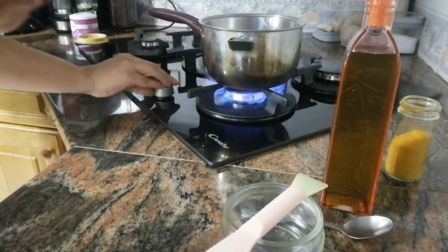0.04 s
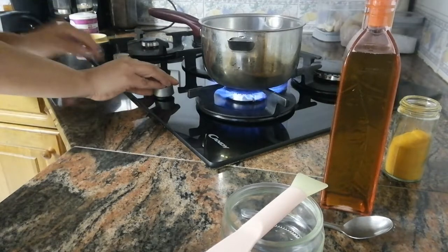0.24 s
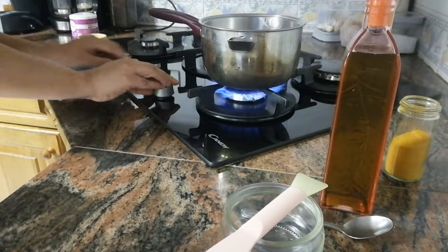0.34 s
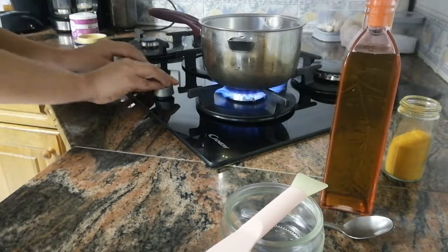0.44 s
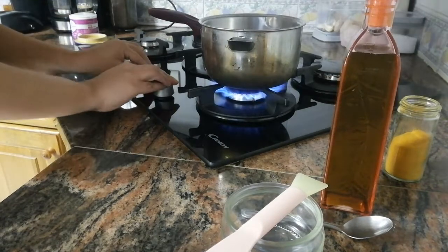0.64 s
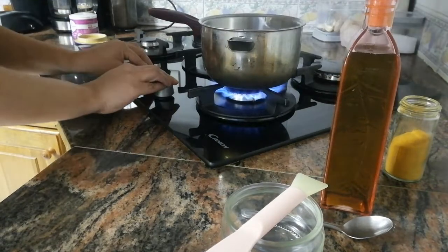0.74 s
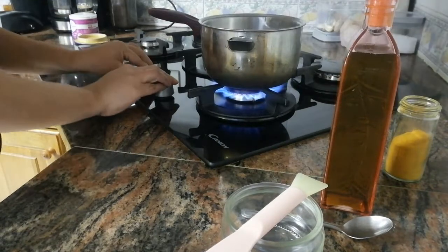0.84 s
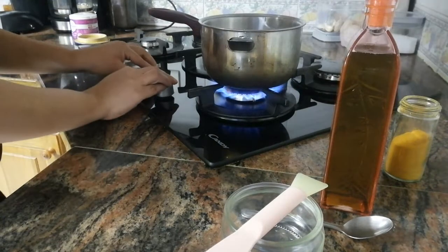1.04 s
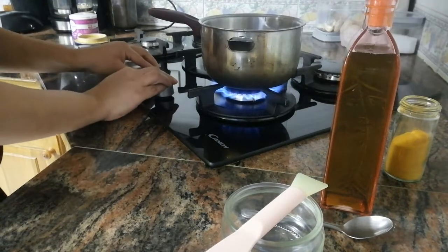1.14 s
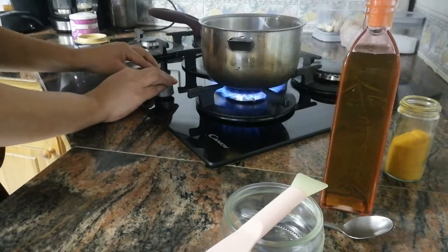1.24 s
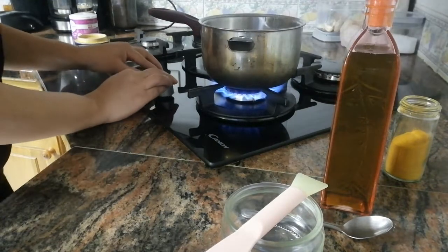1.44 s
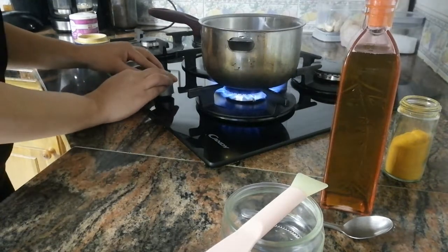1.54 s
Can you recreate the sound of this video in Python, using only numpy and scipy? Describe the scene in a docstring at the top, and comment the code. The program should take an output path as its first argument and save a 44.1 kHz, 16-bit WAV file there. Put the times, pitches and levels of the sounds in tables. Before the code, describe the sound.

Loud, bright igniter clicks repeat about three times a second, each with a short kitchen ring, over quiet hissing burner gas; close stereo microphones, the clicks sharper on the right, slightly duller on the left.

```python
"""Sparks over a gas hob

A dull knock on the hob starts the scene, over hissing gas and a murmuring flame, both made of shaped noise.
The gas whistles first, then settles into wavering jet tones. Four close, sharp snaps of the igniter follow:
each is a pulse thrown back by pot, hob and worktop, and the tiled kitchen rings on. The knob ticks at the
end. A limiter ducks at every spark. Sound reaches two microphone ports, left and right."""
import sys
import numpy as np
from scipy import signal
from scipy.fft import rfft, irfft
from scipy.io import wavfile
from scipy.ndimage import uniform_filter1d, minimum_filter1d, map_coordinates

SR = 44100
rng = np.random.default_rng(int(sys.argv[2]) if len(sys.argv) > 2 else 0)


def store_pcm(level_fs):
    """Save levels as 16-bit WAV."""
    pcm = np.round(np.clip(level_fs, -1, 1) * 32767).astype(np.int16)
    wavfile.write(sys.argv[1], SR, np.atleast_2d(pcm).T)


N = 70560

# How much duller the left port is than the right. Each row: frequency in Hz, level in dB.
LEFT_SHADOW = [(1000, 0), (2500, 1), (4500, 0), (6300, -5), (7600, -9.5), (9200, -20.5), (11000, -19),
               (12500, -8), (15500, -10)]
LEFT_LEAD_S = 0.00065

# Colour of the gas hiss. Each row: frequency in Hz, relative level in dB.
HISS_COLOUR = [(200, -0.5), (500, -2), (1100, -0.5), (2200, 3.5), (3300, -0.5), (5200, -2), (7500, 4),
               (10000, 7), (11300, -15.5), (15500, -18)]
HISS_DB, HISS_PATCHY_DB = -50, 4
SHARED_NOISE = 0.35  # share of the gas noise power that is the same at both ports

# Whistles while the flow settles. Each row: frequency in Hz, glide in Hz per second, width in Hz,
# level in dB before they fade.
OPENING_WHISTLES = [(894, -1, 76, -51.5), (1974, -900, 170, -57.5), (2751, 4.5, 2700, -55),
                    (4750, 2482, 640, -59.5), (7200, 2500, 580, -54.5), (9000, 0, 1300, -70),
                    (11060, 3008, 360, -66.5)]
SETTLE_S, SETTLE_FADE_S = 0.2, 0.04

# Colour of the flame's murmur. Each row: frequency in Hz, relative level in dB.
MURMUR_COLOUR = [(25, -9.5), (50, -8), (82, 3), (112, -11.5), (140, 0), (175, -5.5), (215, -21),
                 (320, -16.5), (600, -53.5), (1500, -49)]
MURMUR_DB, MURMUR_WAVER_DB, MURMUR_WAVER_HZ = -59, 3.7, 8.22

# Knocks on the hob. Each row: start in seconds, level in dB.
HOB_KNOCKS = [(.002, -40), (0.516, -51)]
# Low tones of the knocked hob. Each row: frequency in Hz, relative level in dB, seconds to fall by 60 dB.
HOB_MODES = [(45.4, -35, 0.23), (91.7, 0, 0.3), (135.5, -0.5, 0.16), (307, -11.5, 0.08)]

# Resonances of the gas jet and burner. Each row: frequency in Hz, width in Hz, level in dB at full flow,
# around which it wavers.
JET_RESONANCES = [(1604, 210, -58), (3007, 50, -69.5), (3896, 290, -59), (6170, 86, -60), (7550, 440, -58),
                  (9450, 110, -55.5), (13130, 200, -72)]
JET_WAVER_DB, JET_WAVER_HZ = 2, 4.8

# The sparks. Each row: start in seconds, relative level in dB, treble tilt in dB per octave.
SPARKS_MADE = [(0.2159, 2, 0), (0.5753, 0.5, 0), (0.9349, -1, -0.5), (1.2945, 1, 0)]
# Ways from the half-hidden spark to the ports, by pot, hob and worktop.
# Each row: delay in milliseconds, relative level in dB, both before a little chance is added.
SPARK_PATHS = [(.1, -21.5), (1.1, -8), (2.65, -0.5), (3.55, -2), (4.75, -7.5), (6.4, 1)]
PATH_JITTER_MS, PATH_SCATTER_DB = 0.0138, 2.5  # the arc never takes quite the same way
# Colour of the snap. Each row: frequency in Hz, relative level in dB.
SNAP_COLOUR = [(200, -49.5), (900, -36.5), (1700, -31), (2600, -19.5), (3500, -17), (4500, -12.5),
               (6200, -5), (7800, 3), (9200, 6.5), (10500, 1), (12000, -12.5), (15500, -17.5)]
SNAP_DB, SNAP_LEFT_DB = 17.5, -21.5  # the LEFT settings are extra dB for the left port
# Short ring of the burner cap. Each row: frequency in Hz, relative level in dB, seconds to fall by 60 dB.
CAP_MODES = [(6770, -27, .06), (7860, -27, .055), (8500, -31, .06), (9145, -23, .05), (9780, -30, .06),
             (10680, -29, .05)]
CAP_DB = -7
# Scatter among the pans and jars: T60 is the time to fall by 60 dB
CLUTTER_DB, CLUTTER_LEFT_DB, CLUTTER_RISE_S, CLUTTER_T60_S = 19.5, 1, 0.0025, 0.081
# Decay of the kitchen. Each row: frequency in Hz, seconds to fall by 60 dB.
KITCHEN_T60 = [(500, 0.2), (3000, 0.33), (8000, 0.31), (11000, 0.25), (15000, 0.24)]
ROOM_DB, ROOM_LEFT_DB, ROOM_RISE_S = 16.5, 0.5, 0.0047
ROOM_TILT_DB, ROOM_PATCHY_DB = -2, 1.5  # tilt is per octave
STILLNESS = 0.77  # share of the reverberation power that is the same from spark to spark

# Faint later whistles. Each row: start in seconds, length in seconds, frequency in Hz,
# glide in Hz per second, level in dB at the middle.
LATER_WHISTLES = [(0.312, 0.25, 882, -2.5, -56.5), (1.273, 0.4, 618, 218.5, -64.5)]
LATER_WIDTH_HZ = 43

# Light ticks of the knob. Each row: start in seconds, level in dB.
KNOB_TICKS = [(1.5925, -40.5)]
# Tones of the knob. Each row: frequency in Hz, relative level in dB, seconds to fall by 60 dB.
KNOB_MODES = [(3060, -5.5, .1), (4200, -7, .06), (4770, 1, 0.023), (8950, -11, 0.11)]

CEILING_DB, RELEASE_S = 1.5, 0.09
KNEE, TOP_HZ = 8, 15800  # a higher KNEE rounds the peaks later and harder


def amp(db):
    """Turn decibels into a gain."""
    return 10 ** (np.asarray(db) / 20)


def unit(x):
    """Scale x to an average (rms) strength of 1."""
    return x / np.sqrt(np.mean(x ** 2) + 1e-20)


def along(points, hz):
    """Read a curve of (Hz, value) points, with pitch on a log scale."""
    f, v = np.transpose(points)
    return np.interp(np.log(hz + 1), np.log(f + 1), v)


def filtered(x, response):
    """Filter x by a response that depends on frequency."""
    hz = np.fft.rfftfreq(2 * N, 1 / SR)
    return irfft(rfft(x, 2 * N) * response(hz))[..., :N]


def causal(db):
    """Build the filter with these levels that answers as promptly as possible (minimum phase)."""
    cepstrum = irfft(db * np.log(10) / 20)
    cepstrum[1:N] *= 2
    cepstrum[N + 1:] = 0
    return np.exp(rfft(cepstrum))


def late(hz, s):
    """Delay by s seconds, written as a filter."""
    return np.exp(-2j * np.pi * hz * s)


def left_right(left_db, right_db=0):
    """Stack a level for each port, ready to add to a spectrum in dB."""
    return np.array([[left_db], [right_db]])


def ports(pair):
    """Sound from the hob reaches the left port earlier, but dulled."""
    left = filtered(pair[0], lambda hz: causal(along(LEFT_SHADOW, hz)) * late(hz, -LEFT_LEAD_S))
    return np.array([left, pair[1]])


def wobble(rate):
    """Draw a smooth random curve through `rate` random points a second."""
    points = rng.standard_normal(64)
    return map_coordinates(points, [np.arange(N) * rate / SR], mode="wrap")


def patchy(x, depth_db):
    """Give x patches of random gain, some hundred hertz by some tens of milliseconds."""
    z = signal.stft(x, nperseg=512)[2]
    field = rng.standard_normal(z.shape[1:])
    field = uniform_filter1d(field, size=3, axis=0)  # smooth over pitch
    field = uniform_filter1d(field, size=12, axis=1)  # smooth over time
    return unit(signal.istft(z * amp(depth_db * unit(field)), nperseg=512)[1][:, :N])


def gas_noise(shape):
    """Rushing gas is coloured noise, partly shared by both ports."""
    shared = np.sqrt(SHARED_NOISE) * rng.standard_normal(N)
    separate = np.sqrt(1 - SHARED_NOISE) * rng.standard_normal((2, N))
    return unit(filtered(shared + separate, shape))


def resonance(centre_hz, width_hz):
    """A resonance keeps a narrow band of the gas noise; its centre may glide."""
    middle = SR / 4  # make the band here, then shift it to its pitch
    band = signal.hilbert(gas_noise(lambda hz: 1 / (1 + 2 * ((hz - middle) / width_hz) ** 2)))
    shift_hz = np.ones(N) * (centre_hz - middle)
    return np.real(band * np.exp(2j * np.pi * np.cumsum(shift_hz) / SR))


def settled():
    """The gas flow settles smoothly, from 0 (just starting) to 1 (full jet)."""
    t = np.arange(N) / SR
    return (1 + np.tanh((t - SETTLE_S) / SETTLE_FADE_S)) / 2


def ring(modes, s):
    """A struck object rings in several tones that die away, from time s."""
    t = np.maximum(np.arange(N) / SR - s, 0)
    return sum(amp(db - 60 * t / t60) * np.sin(2 * np.pi * hz * t) for hz, db, t60 in modes)


def gas_hiss():
    """Escaping gas makes a steady wide hiss with small random patches."""
    noise = gas_noise(lambda hz: amp(along(HISS_COLOUR, hz)))
    return amp(HISS_DB) * patchy(noise, HISS_PATCHY_DB)


def opening_whistle():
    """Before the flow settles, the gas whistles in bands, some of them gliding."""
    t = np.arange(N) / SR
    bands = sum(amp(db) * resonance(hz + glide * t, width) for hz, glide, width, db in OPENING_WHISTLES)
    return np.sqrt(1 - settled()) * bands


def flame():
    """Burning gas gives a low, fluttering murmur, alike at both ports."""
    murmur = unit(filtered(rng.standard_normal(N), lambda hz: amp(along(MURMUR_COLOUR, hz))))
    return amp(MURMUR_DB + MURMUR_WAVER_DB * wobble(MURMUR_WAVER_HZ)) * murmur


def hob_knocks():
    """Soft blows ring the hob's low tones."""
    return sum(amp(db) * ring(HOB_MODES, s) for s, db in HOB_KNOCKS)


def jet_tones():
    """At full flow the jet and burner resonate, each tone wavering in level."""
    tones = np.zeros((2, N))
    for hz, width, db in JET_RESONANCES:
        level_db = db + JET_WAVER_DB * wobble(JET_WAVER_HZ)
        tones += amp(level_db) * resonance(hz, width)
    return np.sqrt(settled()) * tones


def tail(t60s, rise_s):
    """Many mixed echoes sound like fading noise; each pitch dies at its own speed (energy 1 a port)."""
    noise = patchy(rng.standard_normal((2, N)), ROOM_PATCHY_DB)
    hz, t, z = signal.stft(noise, SR, nperseg=128)
    decay = amp(-60 * t / along(t60s, hz)[:, None])
    x = signal.istft(z * decay, SR, nperseg=128)[1][:, :N]
    rise = 1 - np.exp(-np.arange(N) / SR / rise_s)
    return unit(x * rise) / np.sqrt(N)


def surroundings(octaves):
    """Pans and jars scatter the sound briefly, and the kitchen reverberates; returned as a filter."""
    clutter = rfft(tail([(1000, CLUTTER_T60_S)], CLUTTER_RISE_S), 2 * N)
    clutter = clutter * amp(CLUTTER_DB + left_right(CLUTTER_LEFT_DB))
    room = rfft(tail(KITCHEN_T60, ROOM_RISE_S), 2 * N)
    room = room * amp(ROOM_DB + ROOM_TILT_DB * octaves + left_right(ROOM_LEFT_DB))
    return clutter + room


def spark_paths(hz):
    """The snap arrives along several short ways, slightly different each time."""
    paths = 0
    for ms, db in SPARK_PATHS:
        level_chance, delay_chance = rng.standard_normal(2)
        delay_s = (ms + PATH_JITTER_MS * delay_chance) / 1000
        paths = paths + amp(db + PATH_SCATTER_DB * level_chance) * late(hz, delay_s)
    return paths


def igniter():
    """Each spark is one sharp pulse that rings the cap, takes several short paths and reverberates."""
    hz = np.fft.rfftfreq(2 * N, 1 / SR)
    octaves = np.log2(np.maximum(hz, 1000) / 8000)  # distance from 8 kHz, for the tilts
    still = surroundings(octaves)
    cap = rfft(ring(CAP_MODES, 0), 2 * N) * amp(CAP_DB)
    out = np.zeros((2, N))
    for s, db, tilt_db in SPARKS_MADE:
        near = (spark_paths(hz) + cap) * amp(SNAP_DB + left_right(SNAP_LEFT_DB))
        far = np.sqrt(STILLNESS) * still + np.sqrt(1 - STILLNESS) * surroundings(octaves)
        colour = causal(db + along(SNAP_COLOUR, hz) + tilt_db * octaves)
        out += irfft((near + far) * colour * late(hz, s))[:, :N]
    return ports(out)


def later_whistles():
    """Now and then a faint, narrow whistle of gas swells, glides and fades."""
    t = np.arange(N) / SR
    out = np.zeros((2, N))
    for s, length, hz, glide, db in LATER_WHISTLES:
        swell = np.sin(np.pi * np.clip((t - s) / length, 0, 1))
        out += amp(db) * swell * resonance(hz + glide * (t - s), LATER_WIDTH_HZ)
    return out


def knob_ticks():
    """The knob ticks under the fingers, ringing its small high tones."""
    return sum(amp(db) * ring(KNOB_MODES, s) for s, db in KNOB_TICKS)


def scene():
    """Sparks over the burning hob."""
    gas = ports(gas_hiss() + opening_whistle() + jet_tones() + later_whistles())
    return gas + flame() + hob_knocks() + igniter() + knob_ticks()


def record(dry):
    """A limiter ducks at loud peaks and recovers, the last peaks are rounded, the top treble is cut."""
    needed = np.minimum(1, amp(CEILING_DB) / (np.abs(dry).max(0) + 1e-9))
    fade = np.exp(-np.arange(N) / SR / RELEASE_S)
    # start each duck just ahead of its peak, then let it fade
    duck = np.maximum.accumulate((1 - minimum_filter1d(needed, size=45)) / fade) * fade
    limited = dry * (1 - uniform_filter1d(duck, size=31))
    # round at four times the sample rate, to avoid false tones
    fine = signal.resample_poly(limited, 4, 1, axis=1)
    fine = fine / (1 + np.abs(fine) ** KNEE) ** (1 / KNEE)
    rounded = signal.resample_poly(fine, 1, 4, axis=1)
    return filtered(rounded, lambda hz: 1 / (1 + (hz / TOP_HZ) ** 160))


dry = scene()
out = record(dry)
store_pcm(out)
```